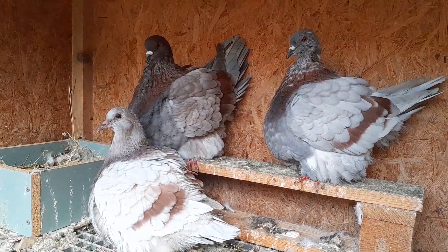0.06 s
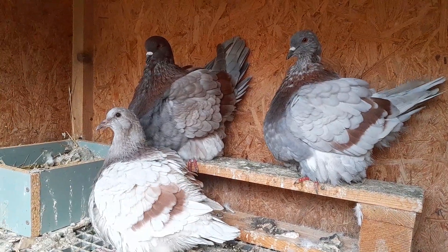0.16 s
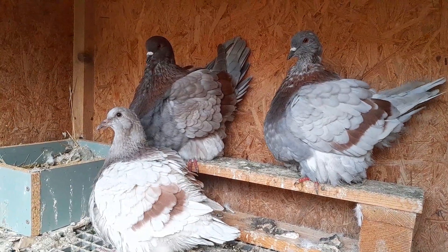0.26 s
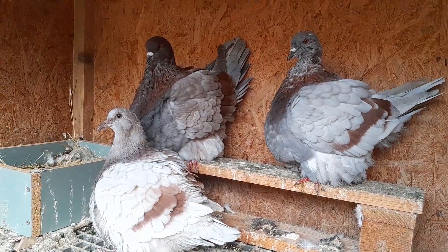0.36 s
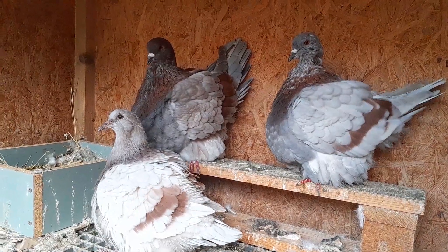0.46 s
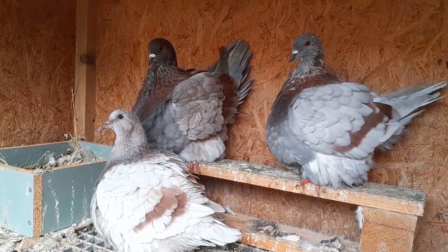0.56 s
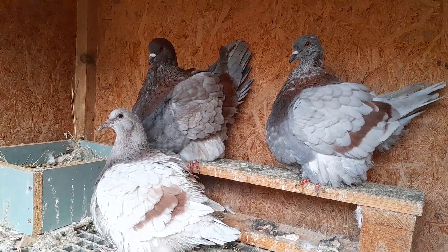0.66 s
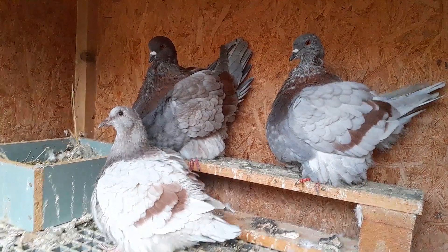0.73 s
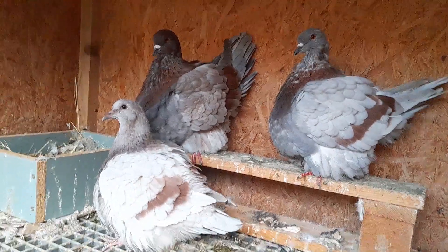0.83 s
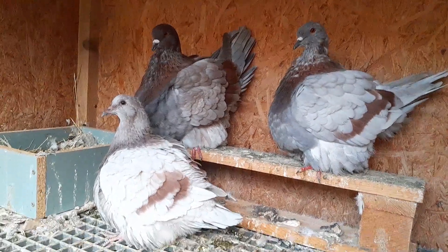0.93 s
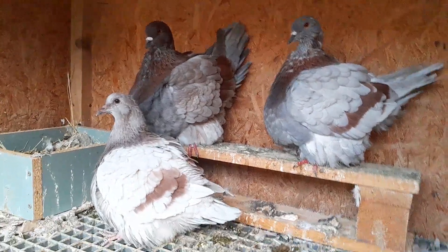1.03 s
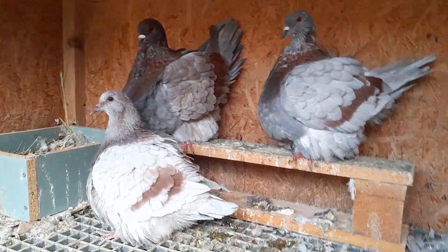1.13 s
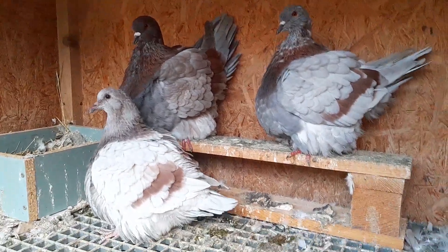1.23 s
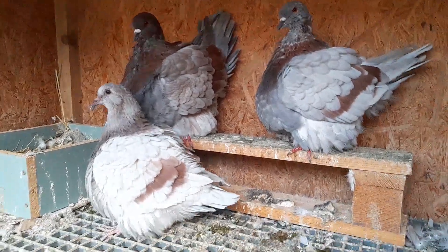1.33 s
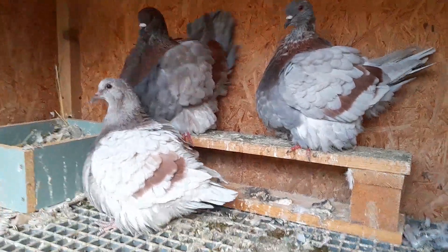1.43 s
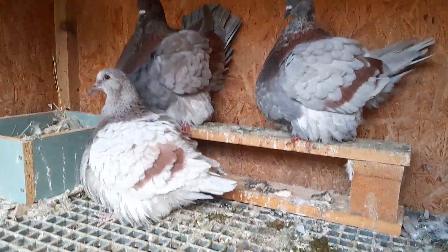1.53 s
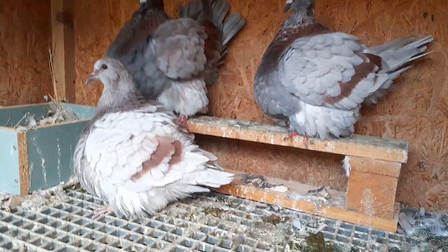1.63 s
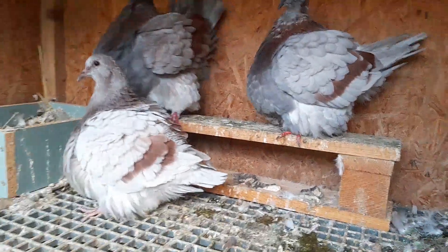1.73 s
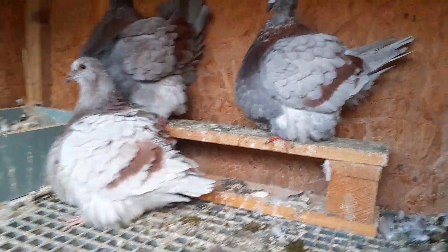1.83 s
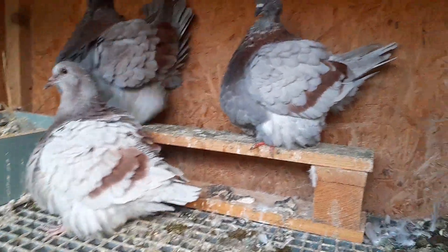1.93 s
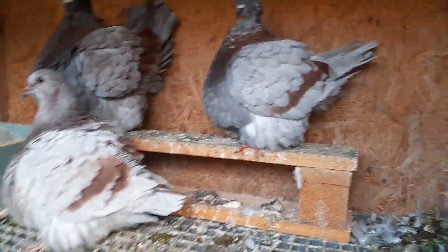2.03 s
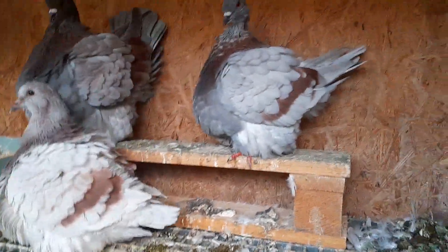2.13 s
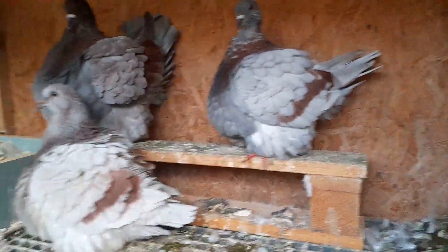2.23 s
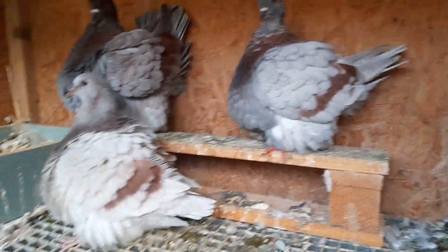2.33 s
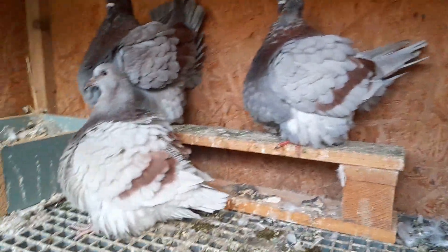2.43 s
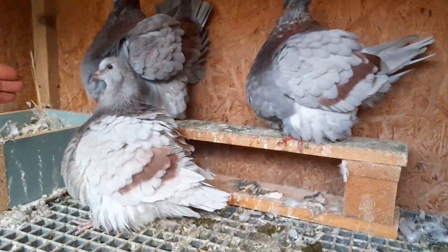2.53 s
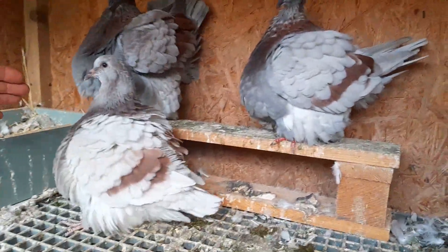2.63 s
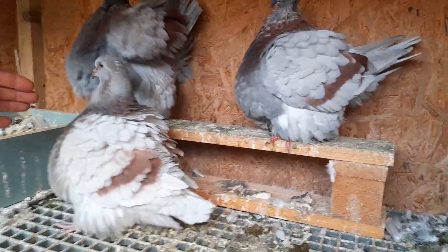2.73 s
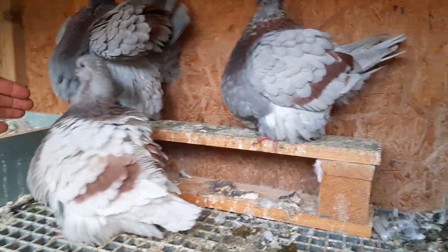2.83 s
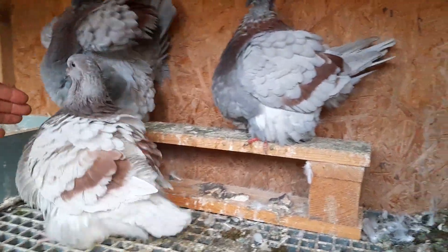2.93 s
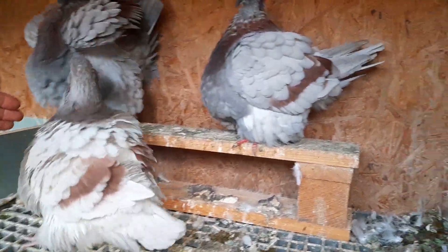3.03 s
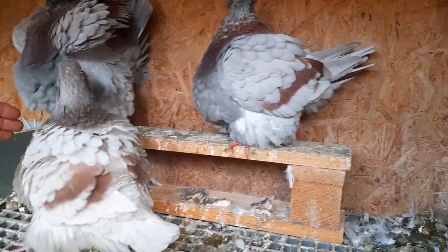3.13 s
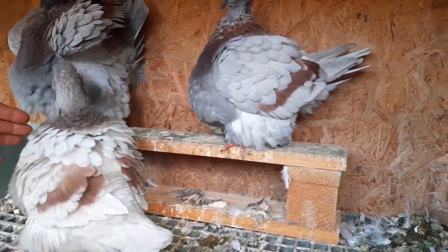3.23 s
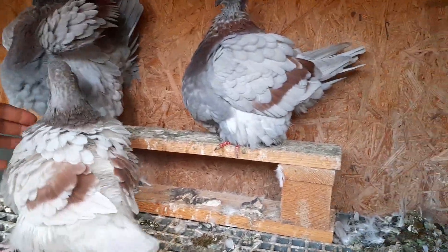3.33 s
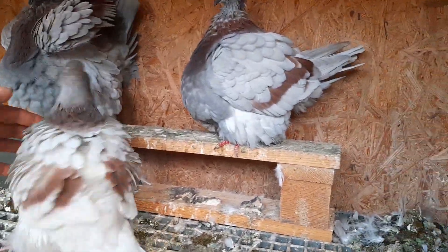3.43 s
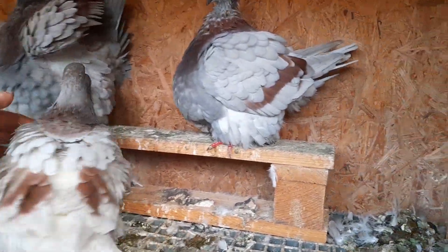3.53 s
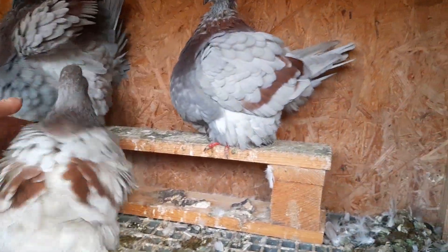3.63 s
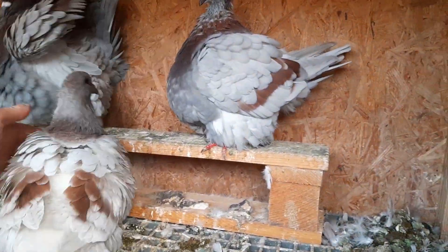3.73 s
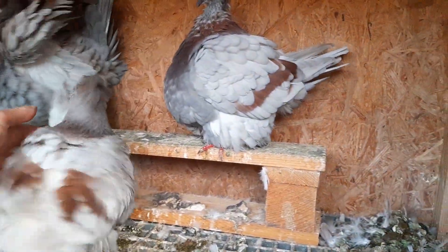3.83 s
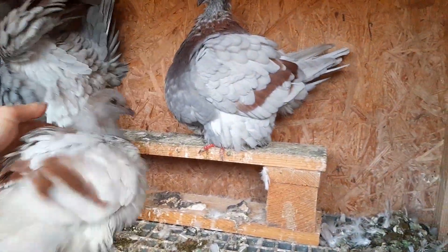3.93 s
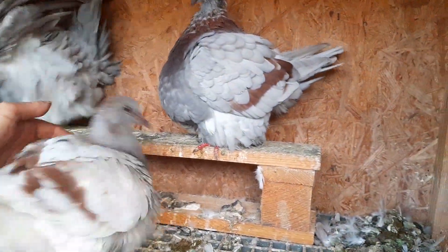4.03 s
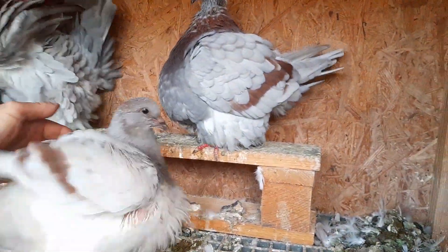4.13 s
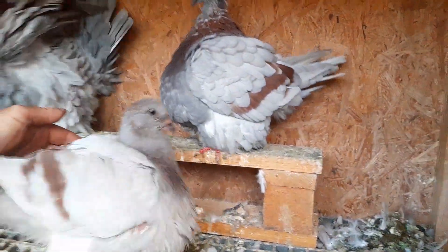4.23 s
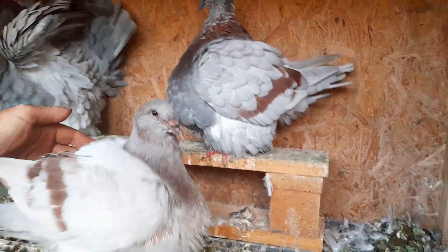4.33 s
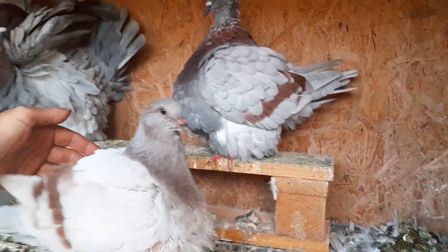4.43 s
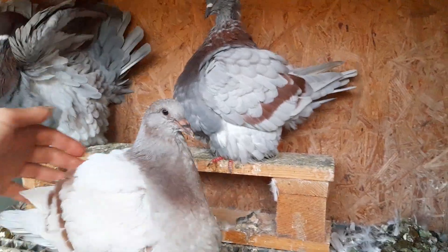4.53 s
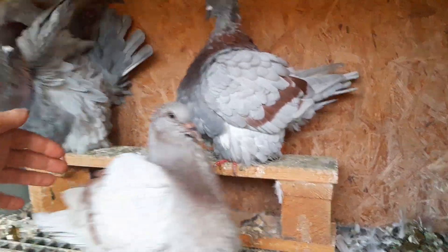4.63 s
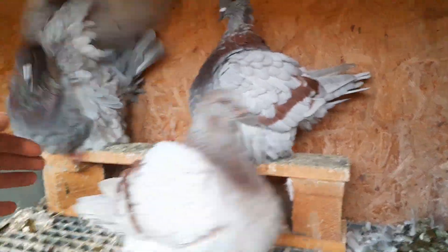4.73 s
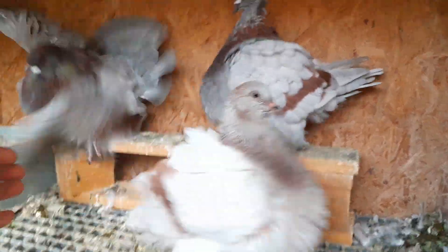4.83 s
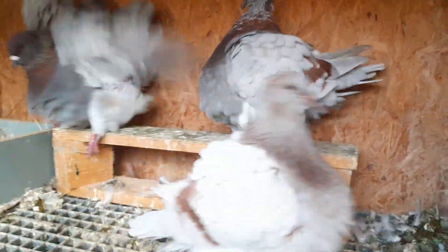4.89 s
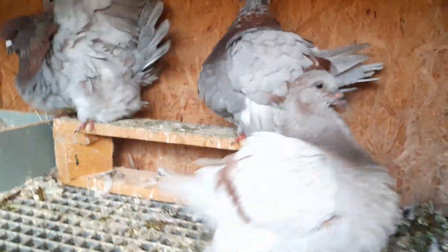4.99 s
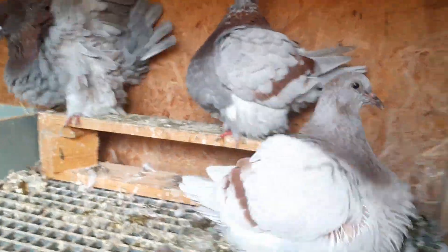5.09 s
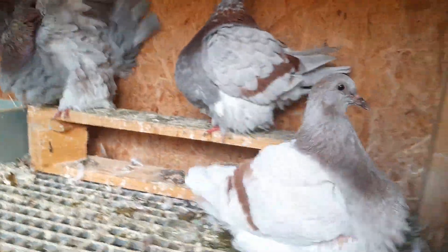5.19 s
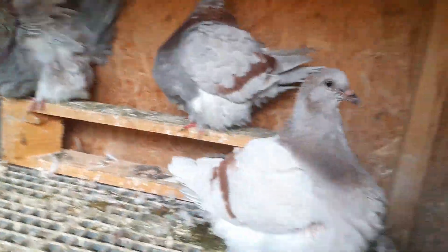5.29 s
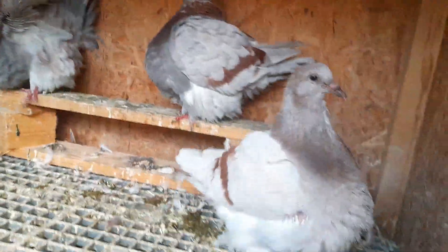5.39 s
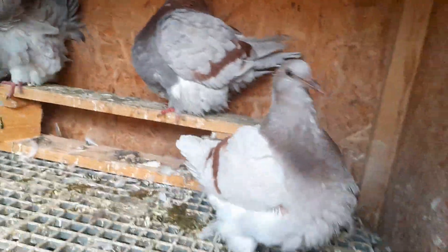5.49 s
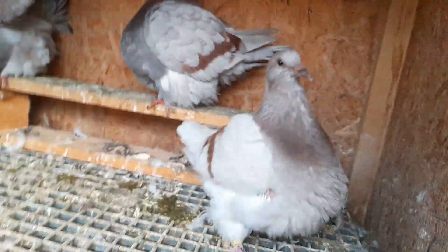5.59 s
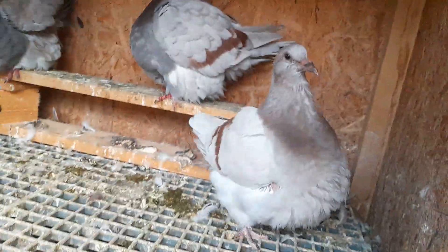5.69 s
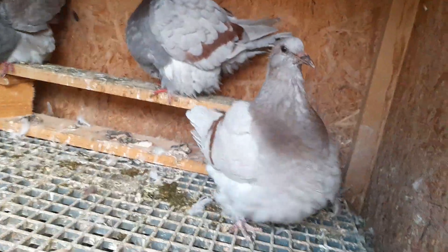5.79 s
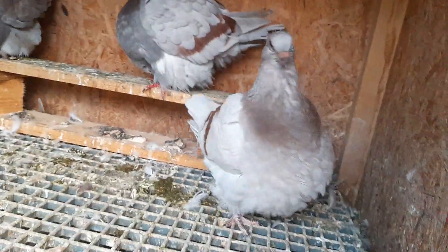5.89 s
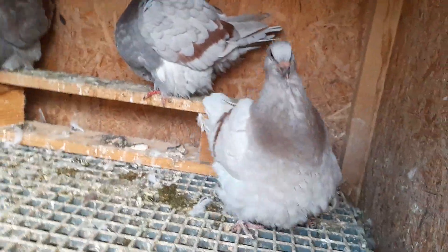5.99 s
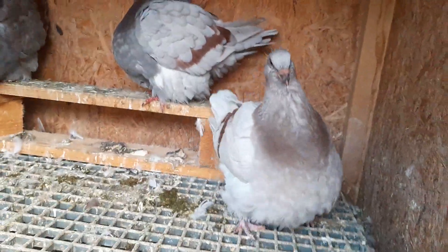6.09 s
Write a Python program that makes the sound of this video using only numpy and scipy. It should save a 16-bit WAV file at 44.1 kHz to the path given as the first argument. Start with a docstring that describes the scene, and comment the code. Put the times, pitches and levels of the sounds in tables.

```python
"""Pigeons shuffle about a small wooden loft while a hand reaches in among them.
First come faint grunts, brushes of filtered noise and soft coos made from gliding tones.
Then feet knock, ringing the boards' resonances; claws tick and sleeve and feathers rustle as noise.
Near 4.8 s one bird beats its wings and hops aside: slaps and a fluttering swish of noise.
The rustle and the treads go on for a while, and one last low coo comes near the end."""
import sys
import numpy as np
from scipy import signal
from scipy.fft import rfft, irfft
from scipy.io import wavfile

SR = 44100
rng = np.random.default_rng(int(sys.argv[2]) if len(sys.argv) > 2 else 0)


def put_to_file(sound):
    """Save the sound as 16-bit audio at rate SR, in the file named by the first command-line argument."""
    columns = np.atleast_2d(sound).T  # one column per channel
    safe = np.clip(columns, -1, 1)
    whole_steps = np.round(safe * 32767)
    wavfile.write(sys.argv[1], SR, whole_steps.astype(np.int16))


N = 271215
TIME = np.arange(N) / SR  # seconds
FREQS = np.maximum(np.fft.rfftfreq(N, 1 / SR), 1)  # Hz, kept above zero for logarithms


def from_db(db):
    """Turn decibels into gain."""
    return 10 ** (np.asarray(db) / 20)


def rms_one(x):
    """Scale a sound to an rms (average strength) of 1."""
    return x / np.sqrt(np.mean(x ** 2) + 1e-20)


def at_hz(points):
    """Read a table smoothly along log frequency."""
    hz, value = np.transpose(points)
    return np.interp(np.log(FREQS), np.log(hz), value)


def drift(rate):
    """Wander randomly with an rms of 1, taking a new value `rate` times a second."""
    knot_rng = np.random.default_rng(rng.integers(1 << 30))
    knots = knot_rng.standard_normal(int(N / SR * rate) + 2)
    return rms_one(np.interp(TIME * rate, np.arange(len(knots)), knots))


def swell(s, rise, t60):
    """Rise up to time s, then die away by 60 dB in t60 seconds."""
    age = TIME - s
    before = (np.minimum(age, 0) / rise) ** 2
    after = np.log(1000) * np.maximum(age, 0) / t60
    return np.exp(-np.minimum(before + after, 30))


def add(out, s, sound):
    """Mix a short sound in at time s."""
    start = max(round(s * SR), 0)
    out[..., start:start + sound.shape[-1]] += sound[..., :N - start]


def resonate(x, hz, q):
    """Let one resonance ring; a higher q makes it narrower."""
    return signal.lfilter(*signal.iirpeak(hz, q, fs=SR), x)


# How alike the two microphones hear a noise.
# Each row: frequency in Hz, likeness from 0 to 1.
MICROPHONE_LIKENESS = [(150, 0.86), (600, 0.4), (3000, 0.2)]


def friction(spectrum, grain_db):
    """Make stereo noise of countless tiny slips of uneven size, coloured by a spectrum; rms 1."""
    grain = from_db(grain_db * np.clip(drift(1500), -3, 3))
    mid, side = rfft(rng.standard_normal((2, N)) * grain)
    alike = np.clip(at_hz(MICROPHONE_LIKENESS), 0, 1)
    pair = np.sqrt(1 + alike) * mid + np.sqrt(1 - alike) * side * [[1], [-1]]
    # Beyond the ends of the table the noise falls off steeply.
    low_skirt = np.minimum(1, FREQS / spectrum[0][0]) ** 3
    high_skirt = np.minimum(1, spectrum[-1][0] / FREQS) ** 3
    return rms_one(irfft(pair * from_db(at_hz(spectrum)) * low_skirt * high_skirt, N))


def scatter(per_s, pitches_hz, q):
    """Scatter random small contacts of uneven size, each ringing one of several resonances; rms 1."""
    out = 0
    for hz in pitches_hz:
        hits = rng.random(N) < per_s / len(pitches_hz) / SR
        clicks = hits * rng.uniform(-0.96, 1, N)
        out = out + rms_one(resonate(clicks + 1e-18, hz, q))
    return rms_one(out)


# Colour of the still air. Each row: frequency in Hz, relative level in dB.
AIR_COLOUR = [(50, 7.5), (250, 2), (500, -16.5), (1000, -22), (9000, -31), (16000, -133)]


def still_air(level_db):
    """Still air is a steady, soft noise, mostly low."""
    return from_db(level_db) * friction(AIR_COLOUR, grain_db=0.0)


def loft(x, t60, wall_hz):
    """The close wooden walls send back dense, short reflections, duller above wall_hz."""
    age = TIME[:SR // 2]
    tail = friction([(30, 0), (wall_hz, 0), (16000, -8)], grain_db=1)[:, :len(age)]
    tail = tail * from_db(-60 * age / t60) * (age > .003)  # silent for the first 3 ms
    return signal.fftconvolve(x, rms_one(tail) / np.sqrt(len(age)), axes=1)[:, :N]


# Hollow ring of the wooden box: a plain list of frequencies in Hz.
BOX_RING_HZ = [614, 751, 1290, 2830, 3150]


def box(x, ring_db, width_hz):
    """The close wooden walls add a hollow ring to whatever stirs between them."""
    return x + from_db(ring_db) * sum(resonate(x, hz, hz / width_hz) for hz in BOX_RING_HZ)


# Colour of the rustling cloth and feathers. Each row: frequency in Hz, relative level in dB.
RUSTLE_COLOUR = [(1800, -6.5), (3000, -1), (4000, -7), (4900, -3.5), (7200, -6), (9700, -8.5),
                 (12300, -2.5), (16000, -11)]
FLICKS_PER_S, FLICK_T60_S = 37, 0.059


def plumage(flick_db, shift_db):
    """Rustle shifts in colour as different feathers rub, and flares when a quill flicks free; rms 1."""
    noise = friction(RUSTLE_COLOUR, grain_db=1.5)
    low = signal.sosfilt(signal.butter(1, 4000, fs=SR, output="sos"), noise)
    high = noise - low
    flicks = (rng.random(N) < FLICKS_PER_S / SR) * rng.random(N)
    fade_per_sample = from_db(-60 / (FLICK_T60_S * SR))
    flare = signal.lfilter([1], [1, -fade_per_sample], flicks + 1e-18)
    colour = low * from_db(shift_db * drift(30)) + high * from_db(shift_db * drift(30))
    return rms_one(colour * (1 + from_db(flick_db) * flare))


# How briskly birds and sleeve move. Each row: time in seconds, effort in dB.
EFFORT_OVER_TIME = [(0.0, -94.5), (0.87, -87), (1.4, -74), (1.7, -74), (1.82, -79.5), (1.93, -73.5),
                    (2.93, -68), (3.1, -80.5), (3.3, -77.5), (3.53, -81), (3.65, -73), (4.08, -71.5),
                    (4.57, -69.5), (4.85, -57), (4.98, -58), (5.3, -67), (5.46, -64.5), (5.86, -68),
                    (6.15, -61.5)]
USUAL_EFFORT_DB = -68.5
# Colours of the rumbling weight and the shuffling feet.
# Each row: frequency in Hz, relative level in dB.
RUMBLE_COLOUR = [(42, 3.5), (65, 8.5), (105, 0.5), (160, -2.5), (270, 1), (420, -34.5)]
SHUFFLE_COLOUR = [(350, -0.5), (750, -15), (1250, -20), (2700, -21)]
# How fast each layer grows, in dB per dB of effort.
RUMBLE_GROWTH, PATTER_GROWTH, SHUFFLE_GROWTH = 0.71, 2.07, 1.31
PATTER_PER_S, GRIT_PER_S = 70, 60


def bustle(rumble_db, patter_db, shuffle_db, grit_db, rustle_db):
    """One effort drives rumbling weight, pattering toes, shuffling feet, grit, and rustling plumage."""
    effort_db = np.interp(TIME, *np.transpose(EFFORT_OVER_TIME)) - USUAL_EFFORT_DB
    rumble_level_db = rumble_db + RUMBLE_GROWTH * effort_db + 2.5 * drift(25)
    rumble = from_db(rumble_level_db) * friction(RUMBLE_COLOUR, grain_db=1)
    toes = scatter(PATTER_PER_S, [hz for hz, _, _ in BOARD_RESONANCES[2:5]], q=5)
    dull_toes = signal.sosfilt(signal.butter(2, 210, fs=SR, output="sos"), toes)
    patter = from_db(patter_db + PATTER_GROWTH * effort_db) * dull_toes
    shuffle_level_db = shuffle_db + SHUFFLE_GROWTH * effort_db + 5.4 * drift(45)
    shuffle = from_db(shuffle_level_db) * friction(SHUFFLE_COLOUR, grain_db=1.5)
    grit = from_db(grit_db + effort_db) * scatter(GRIT_PER_S, np.geomspace(500, 2200, 12), q=5)
    rustle = from_db(rustle_db + effort_db) * plumage(flick_db=2, shift_db=2)
    return rumble + patter + shuffle + grit + rustle


# Faint throaty grunts. Each row: time of the peak in seconds, relative level in dB.
GRUNT_TIMES = [(0.15, -48.5), (0.229, -48.5), (0.29, -44), (1.274, -48), (1.357, -50), (3.359, -43.5)]
# Colour of the throat. Each row: frequency in Hz, relative level in dB.
GRUNT_COLOUR = [(220, -1.5), (290, 10), (380, -14), (520, -2.5), (620, -17.5)]


def grunts(level_db, rise_s, t60):
    """Grunts are short, rough murmurs of noise shaped by the throat."""
    murmurs = sum(from_db(db + level_db) * swell(s, rise_s, t60) for s, db in GRUNT_TIMES)
    return murmurs * friction(GRUNT_COLOUR, grain_db=3.0)


# Soft coos. Each row: start in seconds, length before the release in seconds, first pitch in Hz,
# last pitch in Hz, relative level in dB.
COO_GLIDES = [(0.519, 0.23, 460, 382, -80), (1.568, 0.22, 500, 407, -82),
              (5.957, 0.1374, 178, 184.4, -50.5)]
COO_ATTACK_S, COO_RELEASE_S = 0.034, 0.021


def coos(level_db, husk):
    """Closed-beak coos are husky, unsteady tones that swell, glide and fade."""
    out = 0
    for s, length, first_hz, last_hz, db in COO_GLIDES:
        hz = np.interp(TIME, [s, s + length], [first_hz, last_hz])
        phase = 2 * np.pi * np.cumsum(hz * (1 + husk * drift(200))) / SR
        attack = (TIME - s) / COO_ATTACK_S
        release = 1 + (s + length - TIME) / COO_RELEASE_S
        gate = np.clip(np.minimum(attack, release), 0, 1)
        out = out + gate * from_db(db + level_db + 4 * drift(90)) * np.sin(phase)
    return out


# Tiny creaks of the wood. Each row: time of the peak in seconds, level in dB, pitch in Hz.
WOOD_CREAKS = [(1.845, -63, 1550), (2.585, -63, 1960)]


def creaks(rise_s, t60):
    """A joint slips in a quick, uneven run that rings one narrow resonance."""
    out = 0
    for s, db, hz in WOOD_CREAKS:
        out = out + from_db(db) * swell(s, rise_s, t60) * scatter(2000, [hz], q=10)
    return out


# Brushes of feathers, feet and sleeve, from dull scrapes to a bright swish.
# Each row: time of the peak in seconds, relative level in dB, rise in seconds,
# pitch of the scrape in Hz, broad friction in dB relative to the scrape.
BRUSHES = [(0.09, -57.5, 0.006, 1710, 12), (0.27, -74.5, 0.0026, 1620, 13), (0.489, -71.5, 0.0076, 5830, 1),
           (.691, -67.5, 0.0017, 7140, 6), (0.957, -65, 0.0062, 4400, 8), (1.129, -55.5, 0.035, 6800, 30),
           (1.468, -68, 0.019, 1140, 15), (1.977, -65.5, 0.0045, 940, 3), (2.072, -63.5, 0.0033, 870, -21),
           (2.33, -53.5, 0.0048, 1430, 3), (2.88, -64, 0.072, 960, -24), (2.977, -58, 0.021, 13000, 2),
           (3.343, -67.5, 0.0066, 1170, -5), (4.747, -46.5, 0.0012, 3770, -25),
           (4.96, -51, 0.014, 860, -15), (5.13, -53.5, 0.059, 780, -41.5), (5.455, -58, 0.051, 550, 6),
           (5.813, -57, 0.022, 660, -24), (6.011, -53, 0.061, 2200, 14), (6.067, -44.5, 0.017, 2280, -39)]
# Colour of the broad friction. Each row: frequency in Hz, relative level in dB.
BRUSH_COLOUR = [(500, 4), (1800, 0), (4000, -5.5), (8000, -7.5), (15000, -21)]
BRUSH_T60_S = 0.34


def brushes(level_db):
    """Short brushes catch and slip: broad friction with one wide resonance each, all fading alike."""
    noise = rms_one(friction(BRUSH_COLOUR, grain_db=3) * from_db(2.8 * drift(140)))
    out = 0
    for s, db, rise, hz, broad_db in BRUSHES:
        scrape = rms_one(resonate(noise, hz, 2))
        brush = rms_one(scrape + from_db(broad_db) * noise)
        out = out + from_db(db + level_db) * swell(s, rise, BRUSH_T60_S) * brush
    return out


# Extra ticks and woody taps, some alone, some together with a tread.
# Each row: time in seconds, relative level in dB, woody part in dB relative to the tick,
# before the overall tick and wood levels are added.
EXTRA_TICKS = [(1.146, -40, 2), (2.353, -42.5, -18), (2.409, -38.5, -9.5), (2.832, -67.5, 14.5),
               (2.962, -46, -5.5), (3.046, -44, -33), (4.073, -61.5, 17), (4.37, -59, 7.5),
               (5.021, -50.5, 12), (5.14, -40, -34), (5.164, -51, -44), (5.191, -44.5, -33),
               (5.463, -62, 19), (5.906, -41.5, -2), (6.006, -43, 12.5)]
# Colours of the bright tick and the woody tap. Each row: frequency in Hz, relative level in dB.
TICK_COLOUR = [(2800, 10), (9000, 5), (12500, 6), (16000, -3)]
WOOD_TAP_COLOUR = [(700, 12.6), (1300, 17.3), (2600, 15)]
# Claws touch with every tread: dB added to the tread's level, and woody part in dB,
# both before the overall tick and wood levels are added.
CLAW_DB, CLAW_WOOD_DB = -23.5, -8


def ticks(tick_db, wood_db, t60):
    """Each touch, extra or in a tread, ticks brightly and taps the wood: a crack, then a short tail."""
    bright = dull = 0
    tread_claws = [(s, db + CLAW_DB, CLAW_WOOD_DB) for s, db, *_ in FOOT_KNOCKS]
    for s, db, woody_db in EXTRA_TICKS + tread_claws:
        touch = swell(s, .0005, t60) + swell(s, .0003, .008)  # tail plus crack
        bright = bright + from_db(db + tick_db) * touch
        dull = dull + from_db(db + woody_db + wood_db) * touch
    return bright * friction(TICK_COLOUR, grain_db=2) + dull * friction(WOOD_TAP_COLOUR, grain_db=2)


# Wing strokes. Each row: time of the peak in seconds, level in dB, rise in seconds,
# time to fade by 60 dB in seconds, feather swish in dB relative to the slap.
WING_STROKES = [(4.789, -48, 0.017, 0.71, 4), (4.826, -24, 0.01, 0.098, -10.5),
                (4.832, -28, 0.003, 0.064, 2.5), (4.862, -29, 0.012, 0.099, 3),
                (4.907, -31, 0.0018, 0.026, 1.5)]
# Colours of the wing's blow on air and wood, and of the swish of its feathers.
# Each row: frequency in Hz, relative level in dB.
SLAP_COLOUR = [(300, 6.5), (950, 1), (1250, -4), (1500, -25)]
SWISH_COLOUR = [(1400, 6), (3200, 4), (4000, 0), (8000, -6.5), (12000, -3), (16000, -7)]


def wings(grain_db, flutter_db):
    """Each stroke is a hollow slap and a swish, fluttering as stiff feathers flick past each other."""
    slap = swish = 0
    for s, db, rise, t60, swish_db in WING_STROKES:
        stroke = swell(s, rise, t60)
        slap = slap + from_db(db) * stroke
        swish = swish + from_db(db + swish_db) * stroke
    flutter = from_db(flutter_db * drift(300))
    return flutter * (slap * friction(SLAP_COLOUR, grain_db) + swish * friction(SWISH_COLOUR, grain_db))


# Feet and bodies on the boards. Each row: time in seconds, relative level in dB,
# hard clack in dB relative to the thud before the overall clack and thud levels are added,
# pitch in Hz that the thud favours.
FOOT_KNOCKS = [(1.086, -45, -27, 212), (1.184, -43.5, -30, 121), (1.971, -43.5, -23, 60),
               (2.839, -34, -15, 193), (2.865, -30, -21, 83), (2.915, -29.5, -19, 75),
               (3.001, -25.5, -7, 340), (3.674, -30.5, -14.5, 100), (3.931, -28.5, -2, 150),
               (4.028, -22, -25, 223), (4.069, -27.5, -17, 70), (4.1, -27.5, -14, 91),
               (4.199, -26.5, -26, 192), (4.37, -17.5, -21.5, 223), (4.64, -31.5, -23, 168),
               (4.818, -16, -6, 257), (4.853, -16.5, -36, 153), (4.922, -26, -25, 120),
               (5.047, -25, -16, 158), (5.187, -22.5, -23, 157), (5.395, -33, -16, 157),
               (5.428, -31.5, -7, 156), (5.53, -32.5, -9.5, 155), (5.583, -29.5, -8.5, 168),
               (5.643, -32.5, -2, 227), (5.716, -26, -26, 102), (5.733, -25.5, -13, 152)]
# Ring of the boards. Each row: frequency in Hz, relative level in dB, time to fade by 60 dB in seconds.
BOARD_RESONANCES = [(58.75, 0.5, 0.33), (78.6, -2.5, 0.2), (112.5, -4, 0.12), (156.8, 0, 0.14),
                    (233.3, -5, 0.19), (267.4, -7.5, 0.22), (394.6, -6, 0.088)]
# Colour of the hard clack. Each row: frequency in Hz, relative level in dB.
CLACK_COLOUR = [(520, 16.5), (700, 10.5), (1050, -7.5)]
# A tread rings the modes near its own pitch most: fall below and above it, in dB per octave.
THUD_BELOW_DB, THUD_ABOVE_DB = 4.5, 9


def knocks(level_db, contact_s, spread_db, detune, clack_db, clack_rise_s, clack_t60):
    """Each contact rings the low board modes anew; a burst of noise stands for crowded higher modes."""
    thuds, clacks, age = np.zeros(N), 0, TIME[:SR // 2]
    hz, mode_db, t60 = np.transpose(BOARD_RESONANCES)[:, :, None]
    for s, db, hard_db, pitch_hz in FOOT_KNOCKS:
        strength, stretch = rng.standard_normal((2,) + hz.shape)
        octaves = np.log2(hz / pitch_hz)
        favour_db = np.minimum(THUD_BELOW_DB * octaves, -THUD_ABOVE_DB * octaves)
        colour_db = mode_db + spread_db * strength + favour_db
        tones = np.sin(2 * np.pi * hz * (1 + detune * stretch) * age)
        rings = from_db(colour_db - 60 * age / t60) * tones
        thud = rings.sum(axis=0) * (1 - np.exp(-(age / contact_s) ** 2))  # a soft foot starts gently
        add(thuds, s, from_db(db + level_db) * rms_one(thud))
        clack = swell(s + 2 * clack_rise_s, clack_rise_s, clack_t60)
        clacks = clacks + from_db(db + hard_db + clack_db) * clack
    return thuds + clacks * friction(CLACK_COLOUR, grain_db=6.5)


# Where the busiest bird treads. Each row: time in seconds, left minus right in dB.
TREAD_PLACE = [(.2, 2), (5.2, -1), (5.7, -2.5)]


def scene():
    """Put birds and boards in the loft, over still air."""
    air = still_air(level_db=-68.0)
    stir = bustle(rumble_db=-54, patter_db=-53, shuffle_db=-64, grit_db=-73.5, rustle_db=-64.0)
    voices = grunts(level_db=-4.5, rise_s=0.016, t60=0.2) + coos(level_db=15.5, husk=0.0548)
    touches = creaks(rise_s=.005, t60=0.24) + brushes(level_db=3.0)
    touches = touches + ticks(tick_db=-11.5, wood_db=-5, t60=0.084)
    touches = touches + wings(grain_db=0.5, flutter_db=2.5)
    steps = knocks(level_db=-17.5, contact_s=0.0032, spread_db=6.0, detune=0.04,
                   clack_db=-4.0, clack_rise_s=0.0011, clack_t60=0.098)
    step_room = from_db(-14) * loft(steps, t60=0.12, wall_hz=1500)
    touch_room = from_db(-16) * loft(touches, t60=0.075, wall_hz=5000)
    pan = from_db(np.interp(TIME, *np.transpose(TREAD_PLACE)) / 2 * [[1], [-1]])
    boxed = box(touches + stir, ring_db=-7.0, width_hz=19.0)
    return pan * (steps + voices) + boxed + step_room + touch_room + air


# How the two microphones differ in tone. Each row: frequency in Hz, left minus right in dB.
MICROPHONE_LEAN = [(380, -0.5), (700, 5), (1200, 3.5), (3000, -3), (4400, 10.5), (7200, 15.5), (14000, 0)]
LEFT_LEAD_S, CUTOFF_HZ = 0.00022, 15900


def record(dry):
    """The left microphone hears a little sooner and brighter; the deepest bass and the top are cut."""
    sides = from_db(at_hz(MICROPHONE_LEAN) / 2 * [[1], [-1]])
    sides = sides / np.sqrt(np.mean(sides ** 2, axis=0))  # keep the total power even
    left, right = irfft(rfft(dry) * sides, N)
    right = np.interp(TIME - LEFT_LEAD_S, TIME, right)
    pair = signal.sosfilt(signal.butter(2, 35, "high", fs=SR, output="sos"), [left, right])
    return signal.sosfilt(signal.ellip(10, .1, 80, CUTOFF_HZ, fs=SR, output="sos"), pair)


dry = scene()
out = record(dry)
put_to_file(out)
```